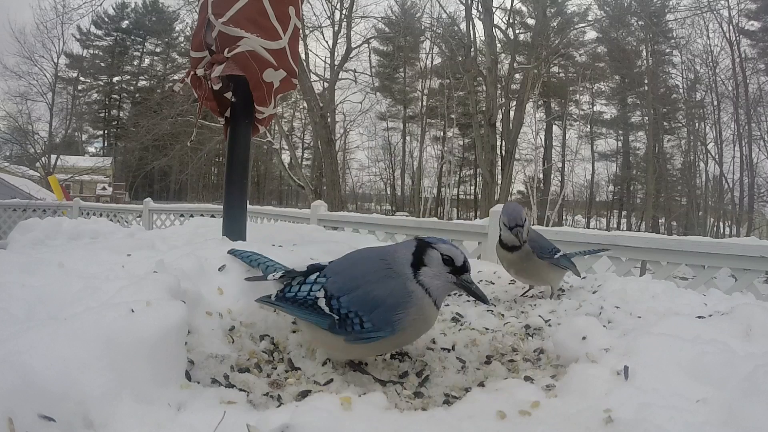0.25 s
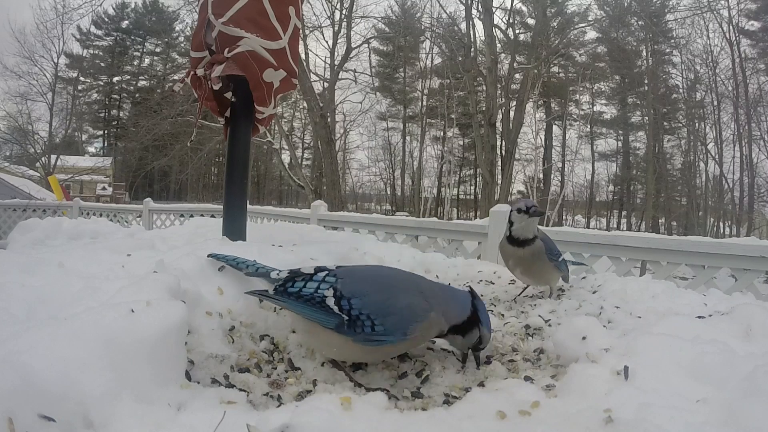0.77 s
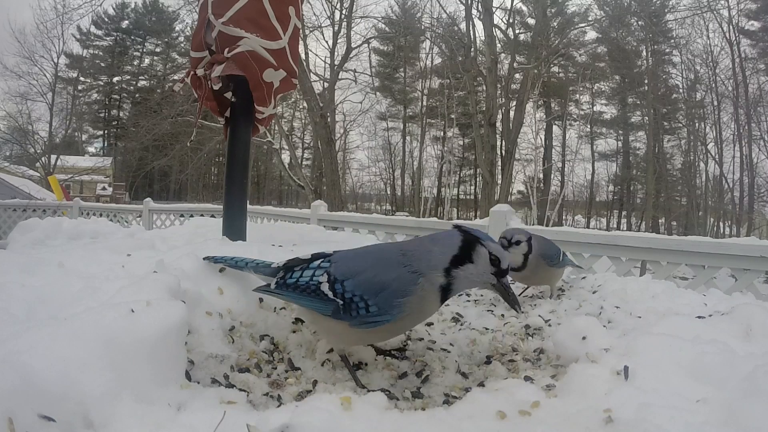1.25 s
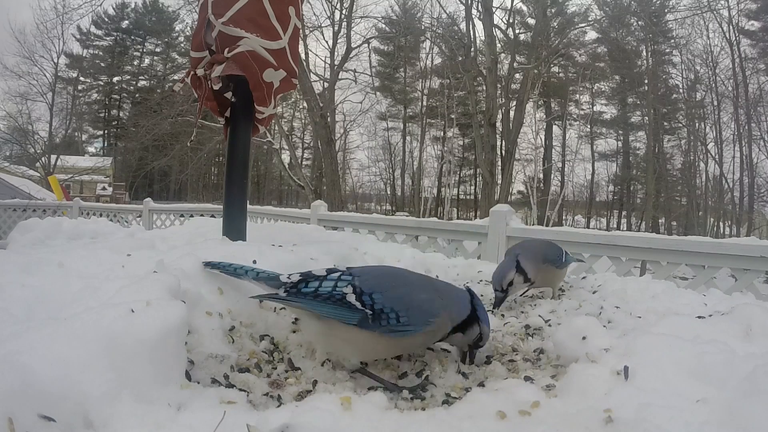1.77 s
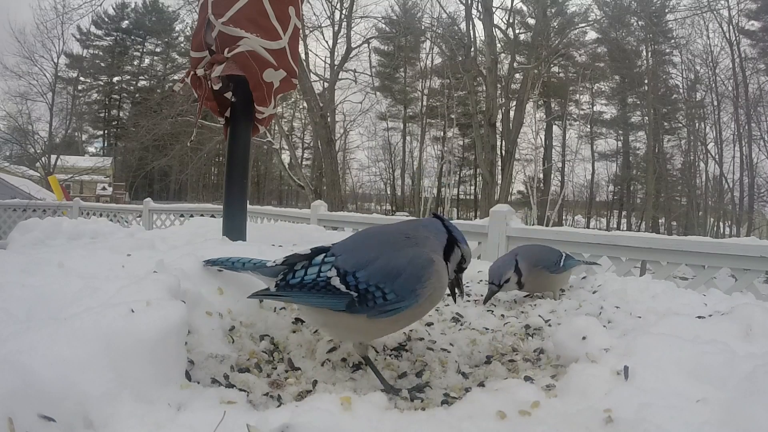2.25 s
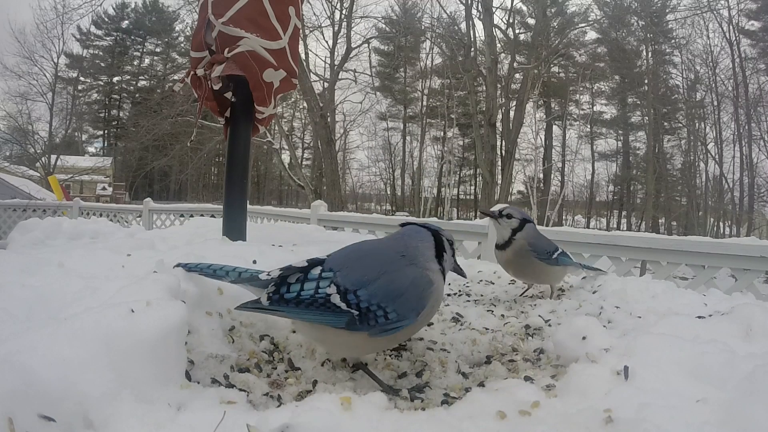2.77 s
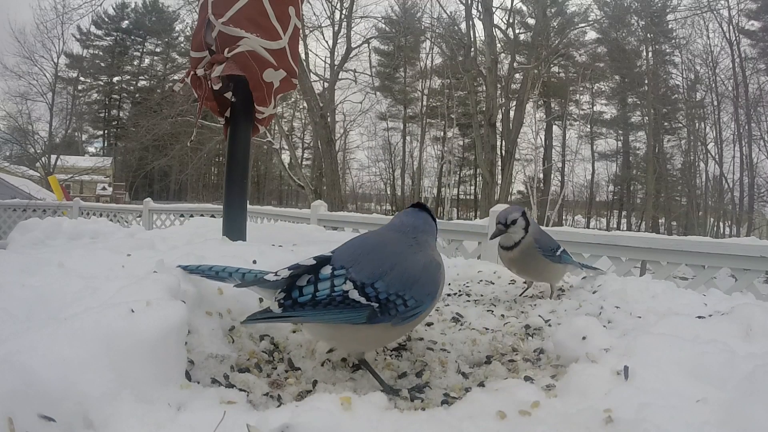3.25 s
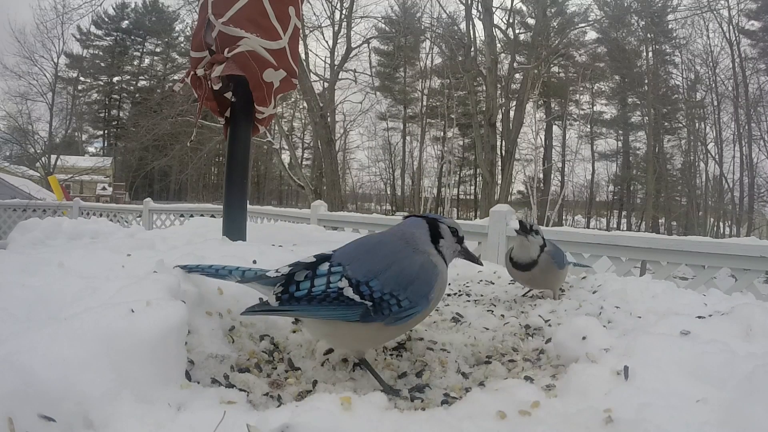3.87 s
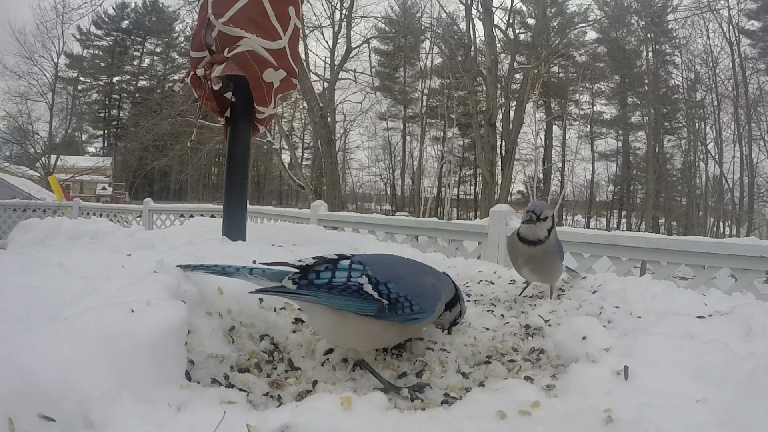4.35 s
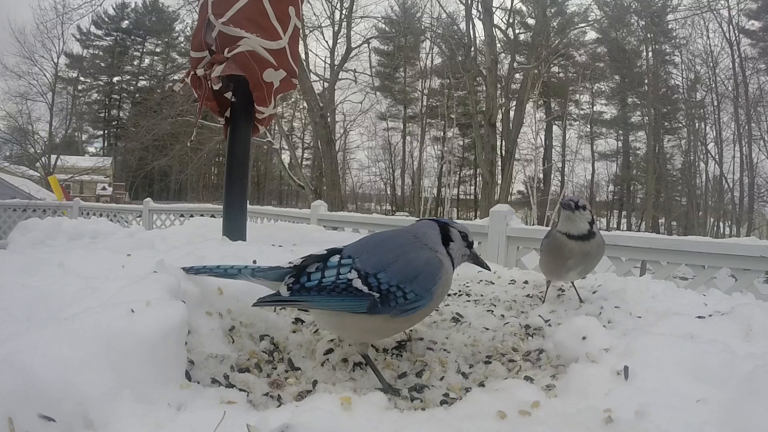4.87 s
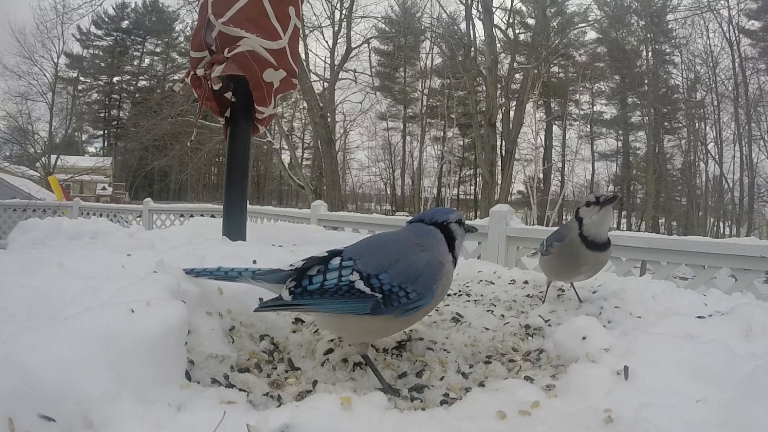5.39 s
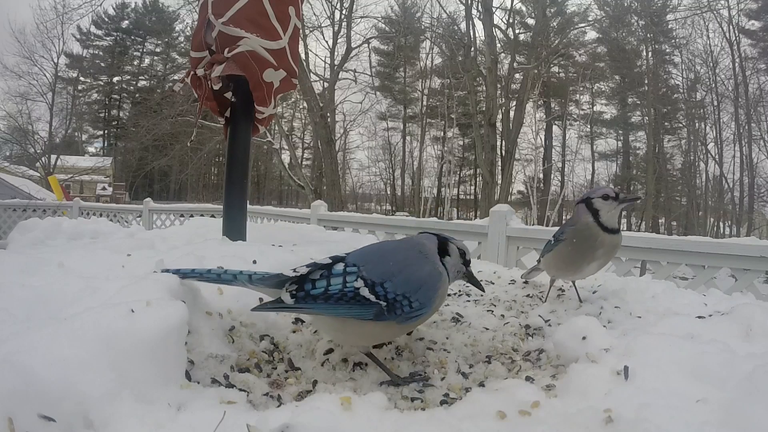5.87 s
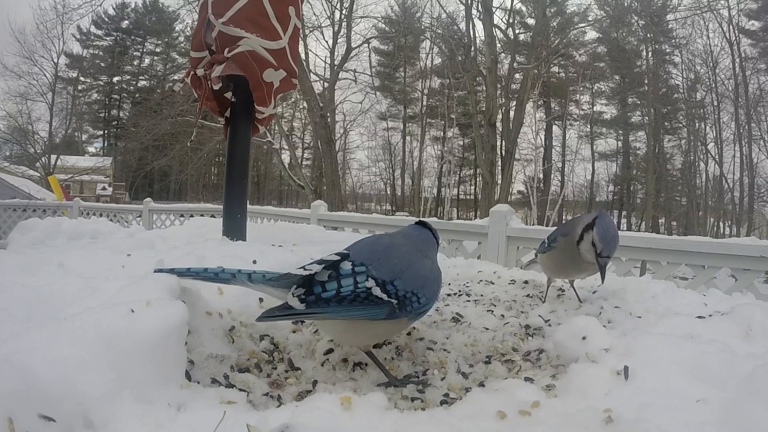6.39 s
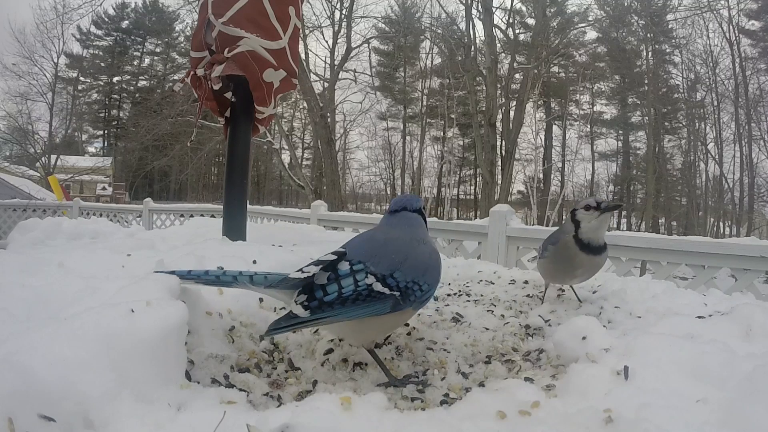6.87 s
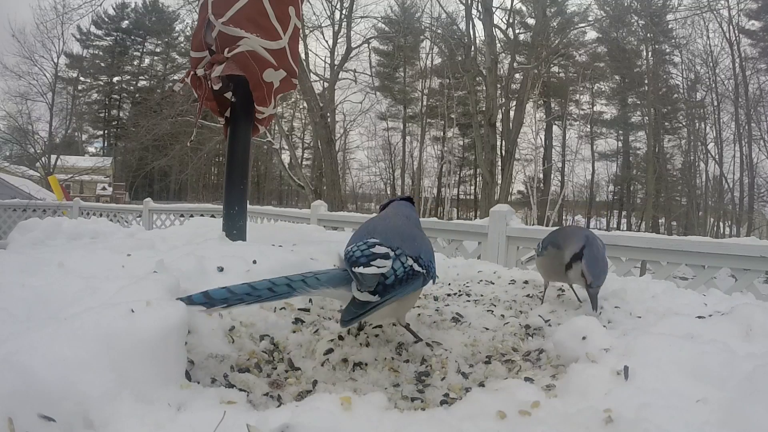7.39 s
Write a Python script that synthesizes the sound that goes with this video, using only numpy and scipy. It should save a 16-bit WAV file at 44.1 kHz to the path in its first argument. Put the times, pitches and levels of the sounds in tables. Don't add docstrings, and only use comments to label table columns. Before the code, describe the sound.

Very close, a jay's beak knocks a seed-covered wooden table in snow: dull, low thumps tipped with brittle cracks and short scratchy scrapes. A busy opening two seconds leads to sparse single blows with long quiet gaps. Behind lie faint air, small pulsing puffs of electronic hiss, a distant hoarse jay calling and a few thin whistles. The microphone is boxed in plastic, so contacts sound muffled and boxy.

```python
import sys
import numpy as np
from scipy import signal
from scipy.fft import rfft, irfft, next_fast_len
from scipy.io import wavfile
from scipy.ndimage import uniform_filter1d

SR = 44100
rng = np.random.default_rng(int(sys.argv[2]) if len(sys.argv) > 2 else 0)


def dump(signal):
    limited = np.clip(np.atleast_2d(signal).T, -1, 1)
    pcm = np.round(limited * 32767).astype(np.int16)
    wavfile.write(sys.argv[1], SR, pcm)


def decibels_to_gain(level_db):
    exponent = np.asarray(level_db, float) / 20
    return 10 ** exponent


N = 336483


def unit(x):
    return x / np.sqrt(np.mean(x ** 2) + 1e-20)


def add(track, s, sound):
    part = track[round(s * SR):][:len(sound)]
    part += sound[:len(part)]


def filtered(x, response):
    m = next_fast_len(N + SR // 2)
    return irfft(rfft(x, m) * response(np.fft.rfftfreq(m, 1 / SR)), m)[..., :N]


def peak(f, hz, width):
    return 1j * f * width / (hz * hz - f * f + 1j * f * width)


# frequency in Hz, level in dB per Hz.
AIR_COLOUR = [(9, -37), (15, -2.5), (32, -7), (49, -6), (107, -7.5), (239, -10), (440, -14.5),
              (1350, -22.5), (2630, -26), (6800, -35.5), (12300, -45), (13000, -43.5), (15000, -45)]
# time in seconds, level in dB.
AIR_LEVEL = [(0.0, -67.5), (0.45, -69.5), (7.63, -70)]


def still_air():
    hz, db = np.transpose(AIR_COLOUR)
    spectrum = signal.stft(rng.standard_normal(N), nperseg=512)[2]
    patches = uniform_filter1d(uniform_filter1d(rng.standard_normal(spectrum.shape), 8, 0), 10, 1)
    patchy = signal.istft(spectrum * decibels_to_gain(0.29 * unit(patches)), nperseg=512)[1][:N]
    bed = unit(filtered(patchy, lambda f: decibels_to_gain(np.interp(np.log(f + 1), np.log(hz + 1), db))))
    s, level_db = np.transpose(AIR_LEVEL)
    return decibels_to_gain(np.interp(np.arange(N) / SR, s, level_db) + 13) * bed


# centre in Hz, width in Hz, level in dB.
PUFF_BANDS = [(6700, 310, 4.5), (9600, 670, -2), (11600, 610, -5), (4620, 1600, 1.5)]
# time in seconds, level in dB.
PUFF_LEVEL = [(0, -4), (.9, 3), (1.7, 3.5), (2.1, -3), (3.05, -13), (3.3, 1), (3.8, 3.5), (5.1, 1),
              (5.7, -7), (7.63, -10)]
# time in seconds, level in dB.
STRAY_PUFFS = [(1.293, -1), (1.90, 2), (2.265, 0), (2.408, 0), (2.603, 0), (2.88, 2.5), (3.975, -1),
               (4.676, 4), (5.64, -4), (5.812, 1), (6.252, 3), (6.75, -4), (7.277, 0)]


def hiss_puffs():
    first_s, every_s, puff_s = 0.075, 4 / 15, 0.013
    t = np.arange(N) / SR
    beat = np.arange(first_s, N / SR, every_s)
    puffs = STRAY_PUFFS + list(zip(beat, np.interp(beat, *np.transpose(PUFF_LEVEL))))
    swell = sum(decibels_to_gain(db) * np.exp(-0.5 * ((t - s) / puff_s) ** 2) for s, db in puffs)

    def bands(f):
        return sum(decibels_to_gain(db) * np.abs(peak(f, hz, width)) ** 2 for hz, width, db in PUFF_BANDS)

    fizz = unit(filtered(rng.standard_normal(N), bands))
    return decibels_to_gain(-73.5) * swell * fizz


# start in seconds, length in seconds, start pitch in Hz, end pitch in Hz, level in dB.
CHIRPS = [
    (4.86, 0.027, 6800, 6700, -72),
    (5.39, 0.073, 6950, 6900, -76),
    (6.51, 0.13, 7000, 7160, -76),
]


def far_bird():
    out = np.zeros(N)
    for s, length, start_hz, end_hz, db in CHIRPS:
        u = np.arange(round(length * SR)) / (length * SR)
        pitch = start_hz + (end_hz - start_hz) * u + 40 * np.sin(2 * np.pi * 2 * u)
        whistle = np.sin(2 * np.pi * np.cumsum(pitch) / SR)
        add(out, s, decibels_to_gain(db) * np.sin(np.pi * u) ** 0.6 * whistle)
    return out


# start in seconds, level in dB.
FAR_CALLS = [(0.769, -76), (1.338, -70), (2.369, -73), (2.93, -75), (3.479, -74), (4.01, -75),
             (4.596, -70.5), (5.103, -72), (5.606, -73), (6.219, -72), (6.729, -71.5), (7.239, -75)]
# harmonic number, level in dB.
FAR_VOICE = [(1, -4), (2, -2.5), (3, -6.5)]


def far_jay():
    call_s, call_hz = 0.063, 1260
    out = np.zeros(N)
    u = np.arange(round(call_s * SR)) / (call_s * SR)
    hoarse = unit(uniform_filter1d(rng.standard_normal((len(FAR_CALLS), SR // 5)), size=200, axis=1))
    for (s, db), waver in zip(FAR_CALLS, hoarse):
        pitch = call_hz * (1 + 0.052 * (np.sin(np.pi * u) - 0.6) + 0.0223 * waver[:len(u)])
        phase = 2 * np.pi * np.cumsum(pitch) / SR
        voice = sum(decibels_to_gain(g) * np.sin(round(k) * phase) for k, g in FAR_VOICE)
        add(out, s, decibels_to_gain(db + 7) * np.sin(np.pi * u) ** 0.86 * voice)
    return out


# centre in Hz, width in Hz.
CASE = [(560, 77), (930, 124), (1390, 120), (2170, 136), (3700, 60)]


def case_rings(noise):
    f = np.fft.rfftfreq(len(noise), 1 / SR)
    skirt = 1 / (1 + 1j * f / 2500 / 0.86 - (f / 2500) ** 2) ** 3
    case = [(-1) ** k * peak(f, hz, width) * skirt for k, (hz, width) in enumerate(CASE)]
    return irfft(rfft(noise) * np.array(case))


# start in seconds, length in seconds, level in dB.
SCRAPES = [(0.053, 0.051, -43.5), (0.11, 0.072, -50), (0.237, 0.075, -51), (0.501, 0.097, -50.5),
           (0.88, 0.075, -49), (1.849, 0.075, -52), (2.641, 0.059, -51), (3.691, 0.083, -52),
           (4.215, 0.071, -54), (4.482, 0.029, -46), (4.517, 0.048, -51.5), (4.658, 0.072, -57.5),
           (5.707, 0.075, -55), (5.76, 0.09, -48), (6.205, 0.06, -47), (7.23, 0.062, -49.5)]


def scrapes():
    out, t = np.zeros(N), np.arange(8192) / SR
    chance = rng.standard_normal((len(SCRAPES), 2, len(t)))
    for (s, length, db), (noise, grip) in zip(SCRAPES, chance[::-1]):
        stroke = np.sin(np.pi * np.clip(t / length, 0, 1)) ** 0.27
        stutter = decibels_to_gain(4.1 * unit(uniform_filter1d(grip, 150)))
        case_db = np.array([-4, -6, -3.5, -4, 1.0])
        add(out, s, decibels_to_gain(db + 10.5 + case_db) @ case_rings(stroke * stutter * noise))
    return out


# start in seconds, pitch in Hz, level in dB.
TICKS = [
    (.158, 4830, -58),
    (.240, 3550, -48),
    (.241, 7700, -57),
    (.315, 5830, -51),
    (.316, 6500, -61),
]


def seed_ticks():
    out, t = np.zeros(N), np.arange(8192) / SR
    for s, hz, db in TICKS:
        envelope = decibels_to_gain(db - 60 * t / 0.016) * (1 - np.exp(-t / 0.0013))
        add(out, s, envelope * np.sin(2 * np.pi * hz * t))
    return out


# time in seconds, peak level in dB,
# low resonance in dB, high resonance in dB, length in ms.
CRACKS = [(0.037, -36.5, -9.5, 0, 4.9), (0.159, -36, -16, 1.5, 0.93), (0.231, -29, -14, -6.5, 3.6),
          (0.496, -33, -7.5, -4, 3.5), (0.552, -38, -7, -9, 3.5), (0.573, -33, -22, -11, 2.7),
          (0.869, -31, -6.5, -5.5, 1.2), (1.175, -37, -10, -4, 3.4), (1.213, -29.5, -2.5, -6.5, 3.5),
          (1.626, -38, -0.5, -4.5, 3), (1.673, -31, -8, -10.5, 3.7), (1.8418, -19, -4.5, -8.5, 1.04),
          (1.864, -35, -15, -20, 3.7), (1.889, -34, -8, -20, 2.8), (3.681, -33.5, -9, -10.5, 3.3),
          (3.759, -39.5, -9, 0.5, 2.5), (4.216, -38.5, 3.5, -1, 2.1), (4.419, -25.5, -19, -7.5, 4.9),
          (4.4945, -31.5, -22, -17, 4.5), (4.905, -42.5, -16, -2, 1.7), (5.762, -35.5, -5.5, -11, 2),
          (5.81, -32, -8, -4, 3.5), (6.192, -30.5, -9, -4, 5.3), (7.2605, -34.5, -9, -7, 1.5)]
# time in seconds, peak level in dB.
CRUMBS = [(0.065, -49), (0.078, -50), (0.096, -54), (0.136, -42), (0.337, -44.5), (0.52, -43), (0.542, -45),
          (0.939, -51), (1.19, -44), (1.911, -49), (2.651, -48), (2.7, -47), (3.744, -44), (3.822, -49),
          (3.834, -44.5), (4.529, -51), (5.772, -42), (5.781, -44), (5.824, -45), (5.84, -56), (6.217, -39),
          (6.246, -41), (7.276, -54), (7.33, -48), (7.388, -49)]


def crunch():
    crumb_low_db, crumb_high_db, crumb_ms = -9.5, -5.5, 2.1
    out, t = np.zeros(N), np.arange(8192) / SR
    bursts = CRACKS + [(s, db, crumb_low_db, crumb_high_db, crumb_ms) for s, db in CRUMBS]
    for s, db, low_db, high_db, ms in bursts:
        noise, size = rng.standard_normal((2, len(t)))
        u = t / (max(ms, 0.5) / 850)
        grains = noise * decibels_to_gain(3.96 * size)
        rings = case_rings((u * np.exp(1 - u)) ** 3.0 * grains)
        rings = rings / np.abs(rings).max(1, keepdims=True)
        case_db = np.array([low_db - 18.5, low_db - 1.0, -7, high_db - 4.0, high_db - 26.5])
        add(out, s - 0.0028, decibels_to_gain(db + case_db) @ rings)
    return out


# start in seconds, length in seconds, level in dB.
ROCKS = [
    (0.133, 0.21, -39),
    (4.472, .2, -55),
    (4.697, 0.174, -42.5),
    (4.948, 0.19, -55),
]


def rocking():
    rock_hz = 21.1
    out, t = np.zeros(N), np.arange(SR) / SR
    for s, length, db in ROCKS:
        lean = np.sin(np.pi * np.clip(t / length, 0, 1))
        add(out, s, decibels_to_gain(db) * lean * np.sin(2 * np.pi * rock_hz * t))
    return out


# frequency in Hz, decay by 60 dB in seconds,
# mode shape at the centre, its change toward the edge.
TABLE = [(21.44, 1.46, 0.0078, 0.034), (45.95, 0.45, 0.41, 0.015), (69.9, 0.94, -0.24, 0.05),
         (89.24, 0.43, -0.55, 0.073), (101.9, 0.47, -0.28, 0.01), (126.5, 0.16, 1, -0.19),
         (144.1, 0.29, 0.73, 0.067), (167.1, 0.32, -0.6, 0.068), (185.4, 0.56, 0.33, -0.024),
         (204.8, 0.37, 0.28, 0.037), (244.8, 0.084, -0.22, 0.92), (318.3, 0.1, 1, -0.47),
         (356, 0.086, 1, -0.33)]


def table_rings(blows):
    out, t = np.zeros(N), np.arange(SR) / SR
    hz, t60, centre, edge = np.transpose(TABLE)[..., None]
    ring = decibels_to_gain(-60 * t / t60) * (1 - np.exp(-t / 0.00067)) * np.cos(2 * np.pi * hz * t)
    lag = np.arange(-300, 300) / SR
    for s, db, sway_db, place, ms in blows:
        spot_db = 1.9 * rng.standard_normal((len(TABLE), 1))
        share = (centre + place * edge) * decibels_to_gain(spot_db + sway_db * (hz < 112))
        force = np.exp(-0.5 * (lag / (max(ms, 0.55) / 1000)) ** 2)
        sound = signal.fftconvolve((share * ring).sum(0), force / force.sum())
        add(out, s + lag[0], decibels_to_gain(db) * sound)
    return out


# time in seconds, strength in dB, place from centre to edge.
STEPS = [(0.071, -42.5, 7.6), (0.122, -38, 2.5), (0.151, -44.5, 3.2), (2.660, -51.5, 2), (2.699, -52, 1.4),
         (4.489, -34.5, 3.5), (5.714, -50, 1.2), (7.241, -41.5, 2.7)]


def footsteps():
    sway_db, contact_ms = 3, 1
    return table_rings([(s, db, sway_db, place, contact_ms) for s, db, place in STEPS])


# time in seconds, strength in dB, slow sway in dB,
# place from centre to either edge, contact in ms.
PECKS = [(0.0422, -37, 9, 5, 0.75), (0.5008, -24, -4, 3, 0.99), (.8702, -30, 8, 3, 0.59),
         (1.1763, -27.5, 6.5, 1.45, 0.67), (1.6251, -17, -6.5, 1.46, 0.86), (1.8402, -16.5, -1, 3.5, 0.39),
         (3.6875, -24, -2, 1.5, 0.65), (4.2178, -16.5, -3, 1.9, 0.81), (4.4259, -29.5, 1.5, -2.5, 0.95),
         (5.7596, -32.5, 8.5, 1.8, 0.29), (6.195, -24.5, 2.5, 2, 0.41), (7.2579, -45, 10.5, 5, 0.45)]
# time in seconds, strength in dB, place.
SECOND_TOUCHES = [(0.5502, -36, 1.5), (1.6814, -33, 1.5), (3.692, -35.5, -2), (3.745, -42, 2.5),
                  (5.766, -38.5, -1.5), (5.815, -40.5, 2.5), (6.200, -36, -0.5), (6.250, -43, 2.5),
                  (7.269, -36, 1)]


def pecks():
    sway_db, contact_ms = -4, 0.4
    return table_rings(PECKS + [(s, db, sway_db, place, contact_ms) for s, db, place in SECOND_TOUCHES])


def scene():
    wood = pecks() + footsteps() + rocking()
    seed = crunch() + scrapes() + seed_ticks()
    background = still_air() + hiss_puffs() + far_bird() + far_jay()
    return (wood + seed + background)[None]


def top_cut(x):
    return signal.sosfilt(signal.butter(12, 14980, fs=SR, output="sos"), x)


def record(dry):
    hz, _, z = signal.stft(dry, SR, nperseg=1024)
    hz = hz[:, None]
    patches = uniform_filter1d(uniform_filter1d(rng.standard_normal(z.shape), size=4, axis=1), size=5, axis=2)
    loudest_db = 20 * np.log10(np.abs(z).max(1, keepdims=True) + 1e-9)
    busy = np.clip((loudest_db + 52) / 15, 0, 1)
    dropped = (unit(patches) < -0.1 + 0.9 * busy) & (hz > 12700)
    kept = z * np.where(dropped, decibels_to_gain(-32), 1) * (hz < 15010)
    mix = signal.istft(kept, SR, nperseg=1024)[1][:, :N]
    return top_cut(mix)


dry = scene()
out = record(dry)
dump(out)
```